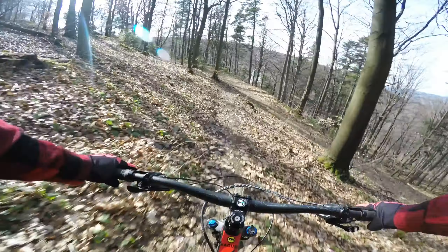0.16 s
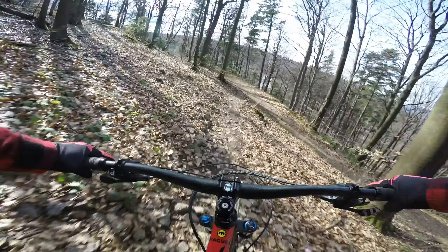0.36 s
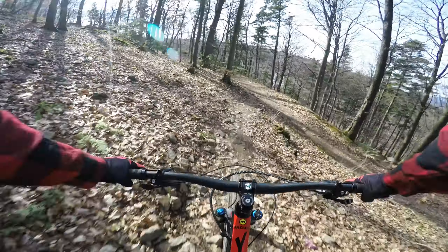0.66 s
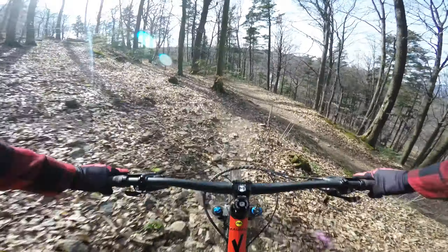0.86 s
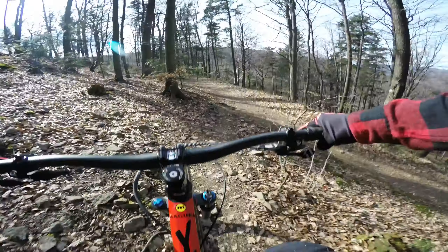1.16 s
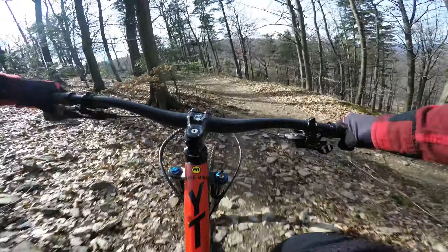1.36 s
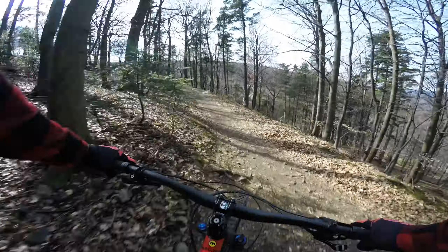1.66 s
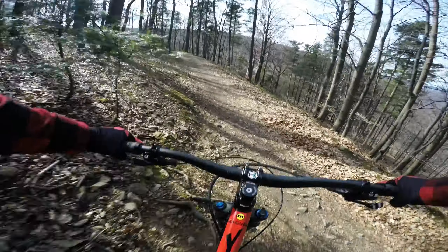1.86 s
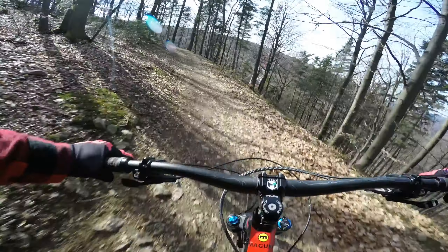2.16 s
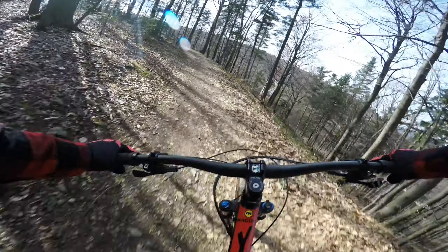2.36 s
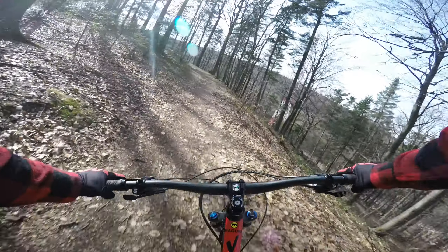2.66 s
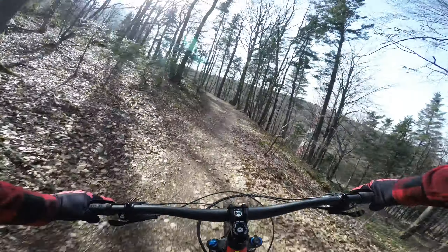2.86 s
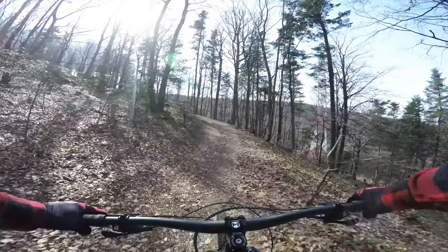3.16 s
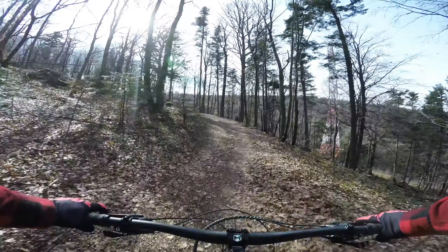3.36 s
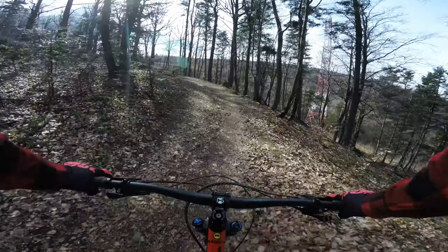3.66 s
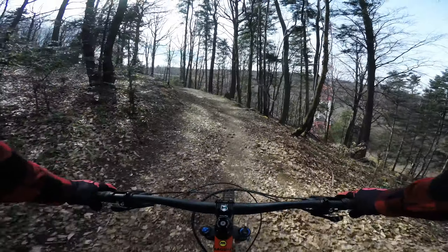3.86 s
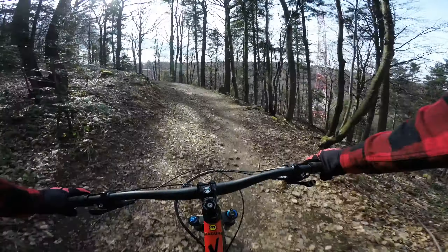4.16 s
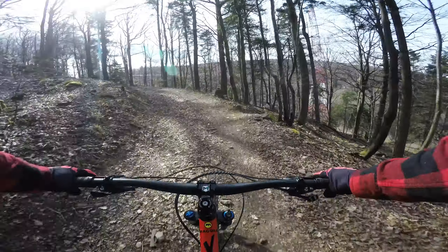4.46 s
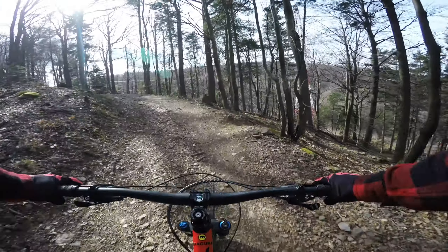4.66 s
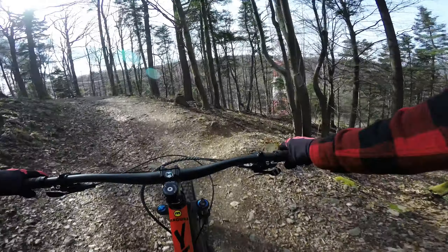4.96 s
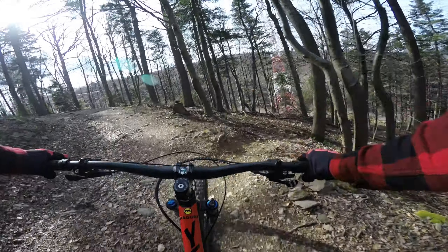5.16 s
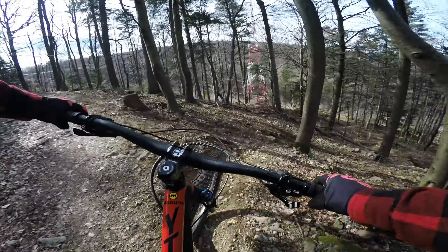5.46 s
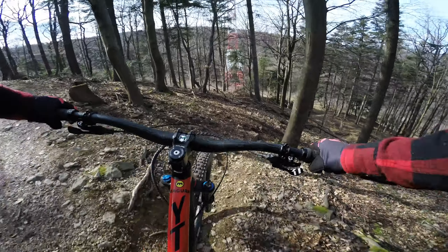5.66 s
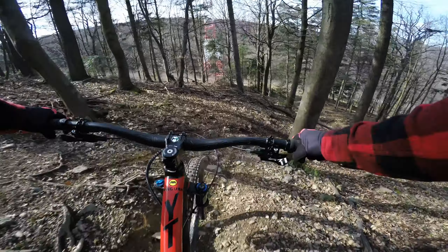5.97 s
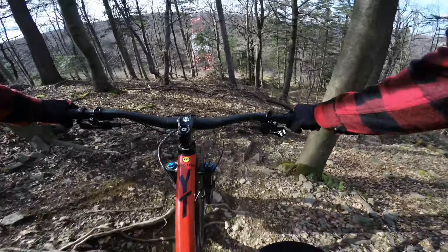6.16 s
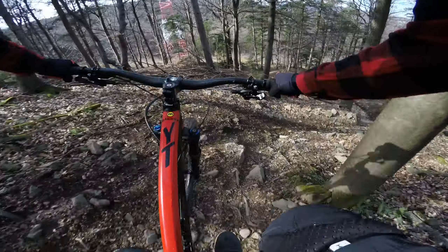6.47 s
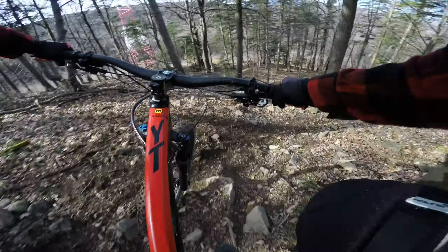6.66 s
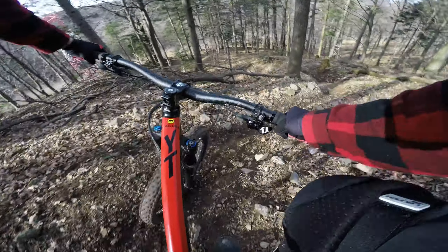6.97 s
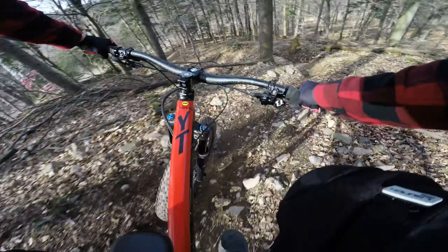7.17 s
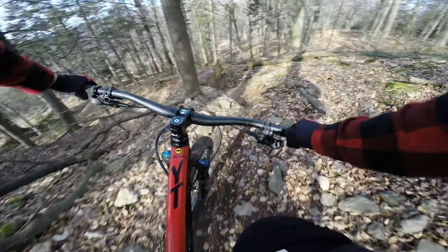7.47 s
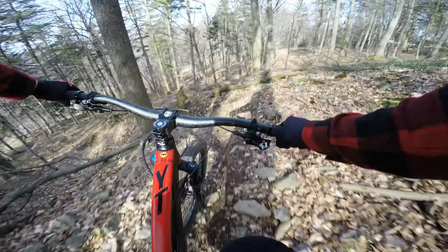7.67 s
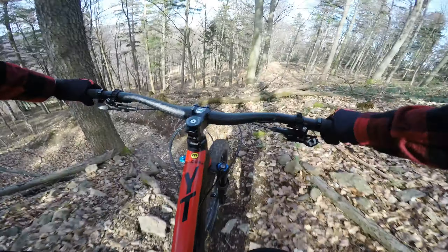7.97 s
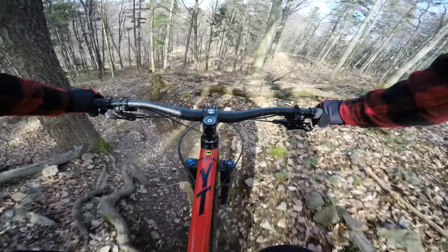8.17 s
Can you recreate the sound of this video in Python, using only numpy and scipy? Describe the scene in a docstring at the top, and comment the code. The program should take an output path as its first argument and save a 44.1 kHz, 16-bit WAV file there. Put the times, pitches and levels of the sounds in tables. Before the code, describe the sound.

A mountain bike coasts down a leafy forest trail, tyres crunching, hub clicking, frame knocking, wind buffeting, then brakes squeal thinly near the end.

```python
"""A mountain bike coasts down a leafy forest trail, heard from a microphone on the rider's chest.
From the start wind noise gusts, tyres drum on dirt and crunch leaves, and the freehub clicks: all shaped noise.
Soon wheel knocks, chain clacks and bright pings of grit join in, each a short strike that rings damped modes.
Later the disc brake chirps and squeals very high, as gliding tones, and the tyre scrapes over rock,
as bursts of grinding noise with one low shudder of the frame."""
import sys
import numpy as np
from scipy import signal
from scipy.fft import rfft, irfft
from scipy.io import wavfile
from scipy.ndimage import uniform_filter1d

SR = 44100
rng = np.random.default_rng(int(sys.argv[2]) if len(sys.argv) > 2 else 0)


def store_wav(level_fs):
    """Save 16-bit WAV to argv[1]."""
    pcm = np.round(np.clip(np.atleast_2d(level_fs), -1, 1) * 32767)
    wavfile.write(sys.argv[1], SR, pcm.T.astype(np.int16))


N = 366912
TIME = np.arange(N) / SR  # seconds

# roughness of the ground under the tyres: time_s, drumming_db (on dirt), crunch_db (of leaves and grit)
GROUND = [(0, -28.5, -37), (0.46, -31, -37.5), (0.72, -23.5, -36), (0.97, -30.5, -39), (1.3, -26, -36),
          (1.94, -30.5, -41), (2.28, -25.5, -35), (2.95, -37.5, -46.5), (3.6, -39, -43.5),
          (4.2, -40, -43.5), (4.6, -39, -44.5), (4.96, -36.5, -43), (5.54, -43.5, -47), (6.07, -39, -44.5),
          (6.36, -33.5, -41), (6.56, -23, -39), (6.635, -33.5, -41), (6.72, -23.5, -34.5), (6.86, -26, -42),
          (6.92, -26, -42), (7.2, -38, -43), (7.5, -30.5, -40.5), (8.13, -30, -40.5), (8.32, -36.5, -43.5)]
# coasting freehub: time_s, clicks_per_s, level_db
HUB_CLICKS = [(0, 136, -46), (.42, 174, -40.5), (1.8, 97, -39.5), (2.1, 98, -45), (2.5, 114, -40.5),
              (2.75, 81, -43), (2.94, 56, -48), (3.02, 130, -38), (3.3, 135, -39.5), (3.8, 124, -43.5),
              (4.0, 137, -43), (4.3, 102, -45), (4.95, 100, -46), (5.28, 67, -46), (5.5, 58, -37.5),
              (5.8, 46.6, -44.5), (6.0, 58, -42.5), (6.3, 76, -42), (7.0, 50, -41.5), (7.32, 58, -39),
              (7.46, 55, -35), (7.62, 46, -38), (8.0, 54, -38.5), (8.32, 47, -45.5)]
# noise spectrum of the freehub pawls and of the rubbing brake pad: frequency_hz, density_db (per Hz)
PAWL_SPECTRUM = [(1500, -16), (3000, -16), (4200, 7.5), (5600, 13), (6700, 10), (8500, 5.5), (10300, 6.5),
                 (12000, 4), (13800, 9), (15000, 7.5), (16000, 4)]
# noise spectrum of blows on the frame: frequency_hz, density_db (per Hz)
FRAME_SPECTRUM = [(60, -7.5), (150, -4.5), (240, 5), (350, 1.5), (540, 0.5), (720, -8.5), (950, 3),
                  (1250, -1.5), (1550, -17), (2200, -15.5), (5000, -28)]
# the hollow frame and wheels ring: frequency_hz, level_db, t60_s
FRAME_MODES = [(236.6, -0.5, 0.16), (432, -8, 0.1), (544, 4, 0.026), (627, -1.5, 0.1), (770, 5, 0.025),
               (876, -3.5, 0.026), (1030, 4, 0.021)]
# noise spectrum of clattering chain and grit: frequency_hz, density_db (per Hz)
CHAIN_SPECTRUM = [(700, -31), (1500, 0.5), (2100, 1), (2650, 4.5), (3200, 9.5), (4000, 2.5), (5400, 8.5),
                  (6500, 1.5), (8000, -4.5), (10000, -14), (15000, -27)]
# the clattering metal rings on: frequency_hz, level_db, t60_s
CHAIN_MODES = [(1730, 0, 0.12), (2576, 8, 0.065), (2860, 13, 0.014), (3420, 7, 0.03), (4940, -2, 0.06),
               (5570, -6, 0.04)]


def gain_of(db):
    """Decibels to amplitude."""
    return 10 ** (np.asarray(db) / 20)


def evened(x):
    """Scales to rms 1."""
    return x / np.sqrt(np.mean(x ** 2) + 1e-20)


def steadied(x, span_s):
    """Takes the swings slower than about span_s out of a noise, leaving rms near 1."""
    size = max(int(span_s * SR), 1)
    power = uniform_filter1d(uniform_filter1d(x ** 2, size), size)
    return x / np.sqrt(power + 1e-12)


def follow(rows, t=TIME):
    """The columns of a curve table at the times t."""
    s, *columns = np.transpose(rows)
    return [np.interp(t, s, c) for c in columns]


def add(mix, s, sound):
    """Mixes a sound in at s seconds."""
    part = mix[max(round(s * SR), 0):][:len(sound)]
    part += sound[:len(part)]


def wander(per_s):
    """Random curve of rms 1, joining per_s random points a second by straight lines."""
    return evened(np.interp(TIME * per_s, np.arange(N), rng.standard_normal(N)))


def colour(x, points, size=4096):
    """Minimum-phase filter with the given spectrum, so that clicks keep their sharp start."""
    f, db = np.transpose(points)
    hz = np.fft.rfftfreq(size, 1 / SR)
    log_gain = np.log(gain_of(np.interp(np.log(hz + 1), np.log(f), db)))
    # folding the cepstrum forward makes the filter causal
    cepstrum = irfft(log_gain)
    cepstrum[1:size // 2] *= 2
    cepstrum[size // 2 + 1:] = 0
    impulse_response = irfft(np.exp(rfft(cepstrum)))
    return signal.oaconvolve(x, impulse_response)[:len(x)]


def grains(per_s, spread_db):
    """Random clicks of either sign and of sizes spread in decibels; rms 1."""
    size = gain_of(spread_db * np.minimum(rng.exponential(1, N), 4))
    sign = rng.choice([-1, 1], N)
    return evened(size * sign * (rng.random(N) < per_s / SR))


def ring(x, modes):
    """Passes a force through damped modes; rms 1."""
    t = np.arange(5000) / SR
    body = sum(gain_of(db - 60 * t / t60) * np.sin(2 * np.pi * hz * t) for hz, db, t60 in modes)
    return evened(signal.oaconvolve(x, body)[:len(x)])


def detuned(modes):
    """The modes as one blow sounds them, each a little off its usual pitch."""
    scatter_share = 0.025  # standard deviation, as a share of the pitch
    return [(hz * (1 + scatter_share * rng.standard_normal()), db, t60) for hz, db, t60 in modes]


def envelope(t, length_s, attack_s, release_s):
    """Rises from t = 0, holds, and falls to nothing at length_s."""
    return np.clip(t / attack_s, 0, 1) * np.clip((length_s - t) / release_s, 0, 1)


def blow(centre_hz, contact_s, body, modes, ring_db, focus_db, octaves, strike_db, turns):
    """A gritty contact swells with one solid strike of a few cycles at centre_hz, and the body rings on; peak 1."""
    t = np.arange(5000) / SR
    contact_s = max(contact_s, .0004)
    force = t * np.exp(-t / contact_s) * rng.standard_normal(len(t))
    # the body's spectrum, weighted around centre_hz
    hz = np.geomspace(60, 16000, 80)
    body_hz, body_db = np.transpose(body)
    focus = np.exp(-(np.log2(hz / centre_hz) / octaves) ** 2)
    db = np.interp(np.log(hz), np.log(body_hz), body_db) + focus_db * focus
    grit = evened(colour(force, np.c_[hz, db], size=2048))
    cycles = np.maximum(t - contact_s / 2, 0) * centre_hz
    strike = evened(cycles * np.exp(-cycles / turns) * np.sin(2 * np.pi * cycles))
    thud = grit + gain_of(strike_db) * strike
    sound = evened(thud) + gain_of(ring_db) * ring(thud, detuned(modes))
    return sound / abs(sound).max()


def wind():
    """Large eddies heave the air at the microphone and small ones flutter; both swell in gusts."""
    # steady airflow on the microphone, before eddies and gusts: time_s, level_db
    airflow = [(0, -16.5), (0.45, -24), (0.6, -27.5), (0.75, -18), (1.6, -18.5), (1.85, -23), (2.25, -16),
               (2.55, -21.5), (3.6, -22), (3.85, -24), (4.3, -27.5), (5.05, -27), (5.3, -40.5),
               (5.7, -38.5), (6.3, -30), (6.85, -21.5), (7.5, -28), (8.32, -30.5)]
    # gusts thump the microphone: middle_s, length_s, pressure_db, flutter_db
    gusts = [(0.008, 0.12, -18, -22.5), (0.16, 0.11, -11, -30), (0.308, 0.24, -16.5, -33),
             (0.466, 0.17, -14, -25), (0.683, 0.095, -15, -24.5), (0.787, .12, -26, -39),
             (0.914, 0.081, -12, -25), (1.122, 0.13, -12.5, -27), (1.382, 0.25, -18, -23.5),
             (1.953, 0.15, -11, -23), (2.09, 0.11, -15, -21), (2.218, 0.2, -30, -19),
             (2.377, 0.37, -18, -33), (2.671, 0.085, -13, -28), (2.916, 0.3, -16.5, -24.5),
             (3.039, 0.27, -19, -22.5), (3.423, 0.36, -18, -25), (3.575, 0.34, -15.5, -25),
             (3.682, 0.12, -11.5, -27), (4.492, 0.075, -29, -25.5), (4.69, 0.34, -22, -35),
             (4.907, 0.057, -24, -44), (5.626, 0.64, -27.5, -41.5), (6.55, 0.087, -15, -31),
             (7.15, 0.16, -19, -44), (7.395, 0.18, -19.5, -34)]
    # spectrum of the slow heaving: frequency_hz, density_db (per Hz)
    pressure_spectrum = [(8, -16), (20, -3.5), (38, 3), (60, -1), (95, -7.5), (140, -17.5), (300, -55.5)]
    # spectrum of the flutter: frequency_hz, density_db (per Hz)
    flutter_spectrum = [(60, -24.5), (110, 0), (160, -1.5), (205, -5), (243, -5), (290, -7.5), (450, -16.5),
                        (800, -25), (1500, -64)]
    eddy_db, eddies_per_s = 1.5, 12

    air_db, = follow(airflow)
    air_db = air_db + eddy_db * wander(eddies_per_s)
    heave_power = gain_of(air_db) ** 2
    flutter_power = gain_of(-11.5 + 0.92 * air_db) ** 2  # flutter follows the airflow
    for s, length_s, pressure_db, flutter_db in gusts:
        swell = np.cos(np.pi * np.clip((TIME - s) / length_s, -.5, .5)) ** 2
        heave_power += (gain_of(pressure_db) * swell) ** 2
        flutter_power += (gain_of(flutter_db) * swell) ** 2
    heave = steadied(colour(rng.standard_normal(N), pressure_spectrum, size=16384), 0.14)
    flutter = colour(rng.standard_normal(N), flutter_spectrum) * gain_of(3.4 * wander(70))
    flutter = steadied(flutter, 0.042)
    return heave * np.sqrt(heave_power) + flutter * np.sqrt(flutter_power)


def tyres():
    """Knobs and grit drum on the casing while leaves crack; both surge with each small bump."""
    # spectrum of the drumming casing: frequency_hz, density_db (per Hz)
    casing_spectrum = [(120, -1), (240, -3), (330, 11), (430, 4.5), (560, 8.5), (720, 1.5), (920, 6.5),
                       (1150, -3), (1500, -25.5), (2000, -20.5), (3000, -32), (6000, -54)]
    # spectrum of crunching leaves: frequency_hz, density_db (per Hz)
    leaf_spectrum = [(880, -4.5), (1500, -5.5), (1820, -13.5), (2140, -3.5), (2420, 3), (2690, 6.5),
                     (3320, 2.5), (4030, -4.5), (4900, 0.5), (5530, -3), (6500, -3), (7340, -9.5),
                     (8160, -10), (9280, -12.5), (10400, -7.5), (13500, -18), (22000, -120)]
    casing_db = -1.5  # the casing's share of the drumming

    drum_db, crunch_db = follow(GROUND)
    bumps = wander(55)
    tread = grains(per_s=420, spread_db=1.0) + 0.38 * rng.standard_normal(N)
    drum = evened(colour(tread, casing_spectrum))
    drum += gain_of(-4.0) * ring(grains(per_s=300, spread_db=3), FRAME_MODES)
    # each leaf breaks in a short cluster of snaps
    t = np.arange(1000) / SR
    breaking = signal.oaconvolve(grains(per_s=260, spread_db=3.0) ** 2, np.exp(-t / 0.0021))[:N]
    snaps = evened(np.sqrt(abs(breaking)) * rng.standard_normal(N))
    crunch = evened(colour(snaps + 0.74 * rng.standard_normal(N), leaf_spectrum))
    # the shaking keeps the chain jingling faintly
    crunch += gain_of(-14.0) * ring(grains(per_s=200, spread_db=-2.0), CHAIN_MODES)
    drum = steadied(drum * gain_of(1.9 * bumps), 1.0)
    crunch = steadied(crunch * gain_of(1.87 * bumps), 0.11)
    return drum * gain_of(drum_db + casing_db) + crunch * gain_of(crunch_db)


def stones(per_s, low_hz, high_hz, contact_s, body, modes, count=16):
    """Random taps of stones of many sizes, each size with its own pitch; rms 1."""
    taps = [blow(hz, contact_s, body, modes, ring_db=-9.5, focus_db=9, octaves=0.49, strike_db=-2, turns=.7)
            for hz in np.geomspace(low_hz, high_hz, count)]
    strength = grains(per_s, spread_db=2.2)
    stone = rng.integers(0, count, N)
    out = np.zeros(N)
    for i in np.flatnonzero(strength):
        add(out, i / SR, strength[i] * taps[stone[i]])
    return evened(out)


def pebbles():
    """Small stones thud on the wheels and gravel ticks out from under them, harder on rough ground."""
    pebbles_per_s, pebble_db = 40, -7.5  # both levels relative to the drumming in GROUND
    gravel_per_s, gravel_db = 30, -22
    drum_db, _ = follow(GROUND)
    thuds = stones(pebbles_per_s, low_hz=305, high_hz=1060, contact_s=0.0015,
                   body=FRAME_SPECTRUM, modes=FRAME_MODES)
    ticks = stones(gravel_per_s, low_hz=1270, high_hz=3100, contact_s=.0006,
                   body=CHAIN_SPECTRUM, modes=CHAIN_MODES)
    return gain_of(drum_db) * (gain_of(pebble_db) * thuds + gain_of(gravel_db) * ticks)


def frame_hum():
    """Rolling keeps the frame's lowest mode humming faintly all the way."""
    return gain_of(-46.0) * steadied(ring(rng.standard_normal(N), FRAME_MODES[:1]), 0.046)


def freehub():
    """Pawls dropping off each ratchet tooth give a burst of noise, and a knock that rings the hub shell briefly."""
    # the hub shell and cassette ring: frequency_hz, level_db, t60_s
    hub_modes = [(2570, -5.5, 0.023), (3010, -5, 0.012), (4870, -10, .015), (5500, -0.5, 0.026),
                 (6970, -7, 0.017), (10300, -7, 0.015)]
    tooth_jitter = .07  # clicks come early or late by about this share of a tooth
    hiss_db, shell_db = 0.5, -5.5  # the balance of the two parts

    rate, level_db = follow(HUB_CLICKS)
    teeth = np.cumsum(rate * (1 + 0.0147 * wander(13))) / SR + tooth_jitter * wander(45)
    age_s = teeth % 1 / rate  # since the latest tooth
    burst = (1 - np.exp(-age_s / 0.00082)) * np.exp(-age_s / 0.0052) + 0.07
    ticks = evened(colour(burst * rng.standard_normal(N) * gain_of(2.1 * wander(60)), PAWL_SPECTRUM))
    # the knock comes about a tenth of a tooth into the burst
    drops = np.diff(np.floor(teeth - .1 + .03 * wander(300)), prepend=0) * gain_of(3.1 * wander(90))
    shell = ring(drops, hub_modes)
    return steadied(gain_of(hiss_db) * ticks + gain_of(shell_db) * shell, 0.25) * gain_of(level_db)


def scatter(hits, body, lag_s, width_s, spread_db):
    """Loose grit and small parts skitter just before and after each blow, in step with its strength."""
    power = np.zeros(N)
    swell = np.hanning(int(width_s * SR)) ** 2
    for s, db, _, _ in hits:
        add(power, s + lag_s - width_s / 2, gain_of(db) ** 2 * swell)
    return np.sqrt(power) * steadied(colour(grains(per_s=900, spread_db=spread_db), body), 0.24)


def rattles():
    """Roots and stones knock through the wheels into the frame; chain, cables and loose stones clack."""
    # a wheel strikes a root or stone: start_s, peak_db, centre_hz, contact_s (no shorter than 0.0004 in use)
    knock_rows = [(0.4355, -11.5, 850, 0.00055), (0.709, -11.5, 800, .0006), (0.76, -12, 950, 0.00044),
                  (0.8215, -21, 900, 0.0012), (0.8275, -11.5, 760, 0.002), (0.872, -17, 1140, .001),
                  (1.09, -10, 870, 0.0025), (1.244, -11, 1100, 0.0007), (1.1547, -8.5, 700, 0.0012),
                  (1.3371, -12.5, 980, .0005), (1.3963, -9, 550, 0.0012), (1.5198, -7, 850, 0.0014),
                  (1.703, -15.5, 700, .001), (2.205, -4.5, 680, 0.0022), (2.228, -15, 596, 0.0026),
                  (2.388, -14.5, 500, 0.0017), (3.164, -16, 450, 0.0009), (3.37, -22, 697, .0008),
                  (4.045, -19.5, 610, 0.00035), (4.2377, -23, 894, 0.00094), (4.252, -22, 820, 0.0013),
                  (4.3144, -14, 970, 0.0011), (4.384, -21, 626, 0.0018), (4.421, -26, 968, 0.0016),
                  (4.448, -18, 604, 0.001), (4.486, -19, 604, 0.00096), (4.5627, -20.5, 630, .0017),
                  (4.64, -28, 1020, 0.00097), (4.6729, -16.5, 754, 0.0024), (4.718, -21.5, 900, 0.0017),
                  (4.7669, -17, 594, 0.00086), (4.808, -25, 894, 0.0013), (4.8365, -13, 950, 0.00054),
                  (4.853, -22, 700, 0.0017), (4.9027, -22, 694, 0.0016), (4.984, -25.5, 750, 0.0019),
                  (5.0845, -20.5, 664, 0.00095), (5.2882, -24, 930, 0.0014), (5.436, -25.5, 700, .001),
                  (5.8018, -9.5, 557, 0.0006), (6.0082, -21, 810, 0.001), (6.076, -28, 480, 0.002),
                  (6.1503, -22, 536, 0.0018), (6.1904, -12.5, 784, 0.0014), (6.441, -17.5, 590, 0.0032),
                  (6.5288, -12.5, 676, 0.001), (6.595, -13.5, 590, 0.0045), (6.6647, -9, 678, 0.0046),
                  (6.739, -7.5, 480, 0.0022), (6.768, -5.5, 780, 0.0051), (6.793, -10.5, 420, 0.0014),
                  (6.825, -12.5, 637, 0.0028), (6.8727, -6, 860, 0.00074), (7.1109, -17, 1098, 0.0015),
                  (7.3566, -13.5, 846, 0.002), (7.374, -11.5, 900, 0.0017), (7.4433, -15, 490, 0.00069),
                  (7.834, -20, 800, .001), (7.903, -18, 700, 0.0014), (7.9317, -17.5, 471, 0.0015),
                  (8.161, -14.5, 960, 0.0028), (8.301, -14, 800, 0.0023), (8.308, -7.5, 738, 0.0012)]
    # chain, cables and loose stones clack: start_s, peak_db, centre_hz, contact_s (same limit)
    clack_rows = [(0.4833, -18.5, 2600, 0.00062), (0.523, -15, 3700, .0007), (0.708, -11, 2900, 0.00053),
                  (0.759, -7.5, 2880, 0.00086), (0.827, -18, 2740, 0.001), (0.956, -19.5, 2900, 0.0016),
                  (1.076, -17, 3700, 0.0007), (1.09, -18, 2510, 0.0017), (1.134, -17.5, 5400, .002),
                  (1.145, -13.5, 2670, 0.0026), (1.222, -18, 2700, 0.00087), (1.23, -15, 5170, 0.0013),
                  (1.337, -17, 2310, 0.00035), (1.35, -17.5, 2110, 0.00078), (1.395, -18, 5210, 0.00084),
                  (1.5194, -9, 2960, 0.00059), (1.7282, -17, 4150, 0.0027), (1.8549, -14.5, 5150, 0.00073),
                  (1.87, -21, 3000, .0008), (1.904, -21.5, 2790, 0.0015), (2.006, -21, 2670, 0.0017),
                  (2.207, -6.5, 1700, 0.0011), (2.2288, -12, 5070, 0.003), (2.23, -14, 2560, 0.003),
                  (2.595, -20, 3240, .0005), (2.729, -25, 2400, .0006), (3.906, -29, 3000, 0.00087),
                  (4.308, -24.5, 2250, 0.0032), (4.3766, -26, 2500, 0.00055), (4.393, -26, 2700, 0.0022),
                  (4.421, -24, 2600, 0.00053), (4.4556, -19.5, 4840, 0.0015), (4.499, -27, 2820, 0.0012),
                  (4.66, -23, 5400, .002), (4.684, -14.5, 5450, 0.00055), (4.702, -24, 5500, .0007),
                  (4.731, -30, 2700, 0.00074), (4.769, -32, 1700, 0.0007), (4.808, -24.5, 2300, .0014),
                  (4.826, -25, 3200, 0.0014), (4.834, -18, 6330, 0.001), (4.8356, -9.5, 3900, 0.0005),
                  (4.853, -30, 3100, 0.0011), (4.916, -22.5, 2750, 0.00052), (4.988, -25, 2900, 0.0014),
                  (5.159, -18.5, 3360, 0.00063), (6.0019, -24.5, 2670, 0.00263),
                  (6.445, -20, 2120, 0.00066), (6.526, -13, 3220, 0.0022), (6.551, -26, 5400, .002),
                  (6.593, -18, 4900, 0.0024), (6.827, -25, 4390, 0.0013), (6.8387, -21, 4900, 0.0046),
                  (6.8744, -24, 5300, 0.0015), (6.8733, -11.5, 1330, 0.0014), (6.988, -22, 5400, .0007),
                  (7.047, -24, 5360, 0.00064), (7.109, -21.5, 2790, 0.00091), (7.356, -21, 3078, 0.0004),
                  (7.386, -17, 4000, 0.0037), (7.443, -21, 3004, .0007), (7.688, -21, 3000, 0.00066),
                  (7.715, -26, 1800, .0007), (7.892, -21, 3790, 0.0018), (7.954, -23, 1900, .0012),
                  (8.086, -24.5, 2500, 0.0029), (8.1216, -21, 3240, 0.00077), (8.166, -24.5, 1510, .0015),
                  (8.302, -22, 3020, 0.0027)]

    out = gain_of(-19.0) * scatter(knock_rows, FRAME_SPECTRUM, lag_s=0.0013, width_s=0.047, spread_db=0.5)
    out += gain_of(-27.0) * scatter(clack_rows, CHAIN_SPECTRUM, lag_s=0.0018, width_s=0.08, spread_db=2.0)
    for s, db, hz, contact_s in knock_rows:
        knock = blow(hz, contact_s, FRAME_SPECTRUM, FRAME_MODES,
                     ring_db=-5, focus_db=8.5, octaves=0.59, strike_db=-3, turns=0.56)
        add(out, s, gain_of(db) * knock)
    for s, db, hz, contact_s in clack_rows:
        clack = blow(hz, contact_s, CHAIN_SPECTRUM, CHAIN_MODES,
                     ring_db=-5.5, focus_db=12, octaves=0.47, strike_db=-5.5, turns=1.0)
        add(out, s, gain_of(db) * clack)
    return out


def pings():
    """Grit flicks against a metal part: a dry, bright tick that hardly rings."""
    # grit meets metal: time_s (before the delay below), level_db (before the trim below), centre_hz
    ping_rows = [(0.493, -14, 14600), (0.621, -13, 6000), (0.8001, -15, 14500), (1.108, -10.5, 7400),
                 (1.6023, -17, 10500), (1.607, -5.5, 7100), (1.794, -5.5, 7140), (2.144, -7.5, 7000),
                 (2.159, -13, 7050), (2.184, -9, 6000), (2.594, -20, 5870), (3.208, -5, 9900)]
    # the pinged metal rings: frequency_hz, level_db, t60_s
    ping_modes = [(5900, 8, 0.04), (7190, 2, 0.031), (7400, -12, 0.014), (10740, 8.5, 0.03),
                  (14200, -3, 0.035)]
    # spectrum of the tick of grit on metal: frequency_hz, density_db (per Hz)
    tick_spectrum = [(2500, -14), (5500, -2.5), (6500, -5), (7200, 6.5), (8600, -6), (9700, -1),
                     (10700, -4), (12500, -11), (14700, -2), (16000, -1)]
    delay_s, trim_db = 0.0022, -1.5

    out = np.zeros(N)
    for s, db, hz in ping_rows:
        tick = blow(hz, 0.000452, tick_spectrum, ping_modes,
                    ring_db=-7.5, focus_db=-1.5, octaves=0.22, strike_db=-7.0, turns=1.8)
        add(out, s + delay_s, gain_of(db + trim_db) * tick)
    return out


def chirps():
    """Where the pad bites hard, the disc gives one short clean glide that starts fast and dies more slowly."""
    # the pad bites: time_s (at the peak), peak_db, pitch_hz (at the peak)
    chirp_rows = [(5.658, -32, 11700), (5.732, -32, 12050), (5.922, -23, 10700), (6.0, -33, 11260),
                  (6.326, -20, 13530), (6.402, -36, 12800), (6.476, -22, 12800), (6.6, -29, 13000),
                  (6.686, -21, 13260), (6.707, -25, 13560), (6.845, -13.5, 11630), (6.967, -8, 11650),
                  (7.125, -16.5, 11500), (7.412, -11.5, 12070), (7.536, -15, 11330), (7.608, -17, 11140),
                  (7.692, -14, 11270), (7.748, -27, 12900), (7.762, -25, 13080), (7.778, -23, 12650),
                  (7.785, -19, 11420), (7.808, -16, 12350), (7.839, -15, 11680), (7.885, -15.5, 11460),
                  (8.002, -18, 11460), (8.067, -12, 11470), (8.12, -28, 11470), (8.21, -26, 12900),
                  (8.278, -16.5, 11200)]
    rise_s, fall_s, sag_hz_per_s = 0.005, 0.011, 9000

    out = np.zeros(N)
    t = np.arange(0, rise_s + fall_s, 1 / SR) - rise_s
    shape = np.cos(np.pi / 2 * t / np.where(t < 0, rise_s, fall_s)) ** 2
    for s, db, hz in chirp_rows:
        # each chirp glides at its own random slope, downward on average
        glide_hz = hz + (rng.normal(0, 12000) - sag_hz_per_s) * t
        tone = np.sin(2 * np.pi * np.cumsum(glide_hz) / SR)
        add(out, s - rise_s, gain_of(db) * shape * tone)
    return out


def brake():
    """The pad sticks and slips on the disc: two close modes beat in an unsteady whistle, flat at each bite."""
    # the pad drags on the disc: start_s, length_s, level_db, pitch_hz, glide_hz_per_s
    squeal_rows = [(5.736, 0.088, -33, 11200, 3500), (5.892, 0.023, -29.5, 11200, -5000),
                   (6.244, 0.04, -32, 11540, -9000), (6.33, 0.085, -28.5, 11700, -3500),
                   (6.449, 0.079, -29.5, 11800, 2000), (6.575, 0.081, -22.5, 12400, 0),
                   (6.716, 0.12, -26.5, 12000, -1500), (6.836, 0.086, -27, 12030, -2000),
                   (6.941, 0.081, -22, 11830, -3000), (7.075, 0.063, -26, 11520, 2000),
                   (7.178, 0.058, -32, 11370, 0), (7.298, 0.047, -28, 11380, -2),
                   (7.378, 0.044, -24.5, 11620, 12003), (7.473, .03, -32, 11550, 0),
                   (7.503, .012, -23, 11790, 0), (7.53, 0.063, -23, 11640, 3000),
                   (7.602, 0.051, -24.5, 11600, 2000), (7.689, 0.07, -25, 11680, 1500),
                   (7.781, 0.067, -23, 11700, 6000), (7.88, 0.11, -27.5, 11770, 3500),
                   (7.996, 0.042, -21.5, 11580, 6000), (8.059, 0.026, -28, 11670, 6000),
                   (8.107, 0.089, -23, 11700, 0), (8.189, 0.054, -27, 11830, 4000),
                   (8.255, 0.079, -22.5, 11570, 0)]
    # the pad chatters and breaks up the squeal: time_s, level_db (relative to the steady whistle)
    chatter_curve = [(6.6, -10), (7.2, -5), (7.55, -7), (8.32, -11)]
    attack_s, ring_s = 0.0065, 0.011
    bite_flat_hz, bite_s = 390, 0.013
    chatters_per_s, pad_hiss_db = 520, -30
    holes_per_tooth, hole_db, hole_hz = 0.93, 3.5, 60

    level = np.zeros(N)
    pitch_hz = np.zeros(N) + squeal_rows[0][3]
    for s, length_s, db, hz, glide in squeal_rows:
        on = TIME >= s
        t = TIME[on] - s
        drag = np.minimum(t / attack_s, 1) * np.exp(-np.maximum(t - length_s, 0) / ring_s)
        level[on] = np.maximum(level[on], gain_of(db) * drag)
        slide_hz = glide * (np.minimum(t, length_s) - length_s / 2)
        pitch_hz[on] = hz + slide_hz - bite_flat_hz * np.exp(-t / bite_s)
    # holes in the disc pass the pad, roughly in step with the freehub's teeth, and shake pitch and strength
    hole_rate = follow(HUB_CLICKS)[0] * holes_per_tooth * (1 + 0.242 * wander(30))
    holes = np.sin(2 * np.pi * np.cumsum(hole_rate) / SR)
    hz = pitch_hz + hole_hz * holes + 95 * wander(60)

    def mode(offset_hz):
        """One disc mode as a complex tone with its own unsteady pitch."""
        mode_hz = hz + offset_hz + 70 * wander(140) + 35 * wander(800)
        return np.exp(2j * np.pi * np.cumsum(mode_hz) / SR)

    modes = mode(-50) + .5 * mode(130)
    chatter = (wander(chatters_per_s) + 1j * wander(chatters_per_s)) / np.sqrt(2)
    chatter = gain_of(follow(chatter_curve)[0]) * chatter
    whistle = (modes * (1 + chatter)).real * gain_of(hole_db * holes + 2.3 * wander(90))
    rubbing = evened(colour(rng.standard_normal(N), PAWL_SPECTRUM))
    return level * (steadied(whistle, 0.062) + gain_of(pad_hiss_db) * rubbing)


def skid():
    """Stones grind and grit crunches under the sliding tyre, and the frame shudders once at a rising low pitch."""
    # the braked rear tyre slides over rock: start_s, length_s, grind_db (stones), crunch_db (grit)
    scrape_rows = [(6.523, 0.036, -21, -27), (6.654, 0.057, -20, -40), (6.695, 0.055, -25.5, -30.5),
                   (6.748, 0.036, -14, -34), (6.778, 0.0359, -20, -50), (6.814, 0.042, -22.5, -30),
                   (7.365, 0.031, -29, -30.5)]
    # spectrum of stones grinding under rubber: frequency_hz, density_db (per Hz)
    grind_spectrum = [(100, 5), (240, 11.5), (350, -5), (450, 0), (600, 16.5), (750, 9.5), (900, 5),
                      (1150, 4.5), (1500, -26), (2000, -17), (3000, -13), (4200, -21), (5500, -26),
                      (9000, -38)]
    shudder_s, shudder_length_s, shudder_db = 6.778, 0.12, -19
    shudder_hz, shudder_rise_hz_per_s = 229.3, 300

    grind = steadied(colour(grains(per_s=1200, spread_db=-1), grind_spectrum), 0.014)
    grind = grind * gain_of(1.9 * wander(70))
    crunch = steadied(colour(grains(per_s=1300, spread_db=-3.0), CHAIN_SPECTRUM), 0.02)
    slide = np.zeros(N)
    for s, length_s, grind_db, crunch_db in scrape_rows:
        scrape = gain_of(grind_db) * grind + gain_of(crunch_db) * crunch
        slide += scrape * envelope(TIME - s, length_s, attack_s=0.0082, release_s=0.022)
    t = TIME - shudder_s
    hz = shudder_hz + shudder_rise_hz_per_s * np.clip(t, 0, shudder_length_s)
    tone = np.sin(2 * np.pi * np.cumsum(hz * (1 + 0.033 * wander(80))) / SR)
    shudder = evened(tone * gain_of(1.2 * wander(59.4))) * gain_of(shudder_db)
    return slide + shudder * envelope(t, shudder_length_s, attack_s=0.015, release_s=0.078)


def scene():
    """Everything is close to the microphone, in open air: a plain sum without echoes."""
    rolling = wind() + tyres() + pebbles() + frame_hum() + freehub()
    impacts = rattles() + pings()
    braking = chirps() + brake() + skid()
    return (rolling + impacts + braking)[None]


def record(dry):
    """The microphone's band limit: a steep low-pass."""
    edge_hz = 15750
    low_pass = signal.firwin(255, edge_hz, window=("kaiser", 9), fs=SR)
    return signal.oaconvolve(dry, low_pass[None], "same")


dry = scene()
out = record(dry)
store_wav(out)
```